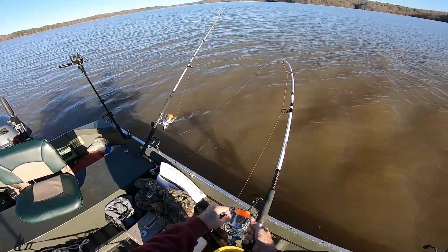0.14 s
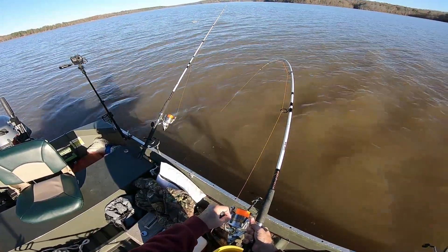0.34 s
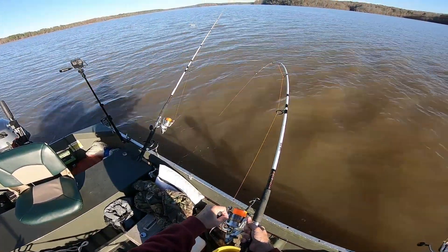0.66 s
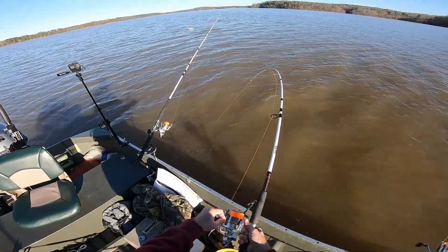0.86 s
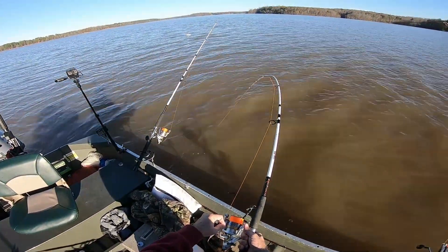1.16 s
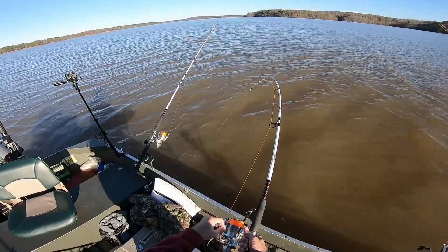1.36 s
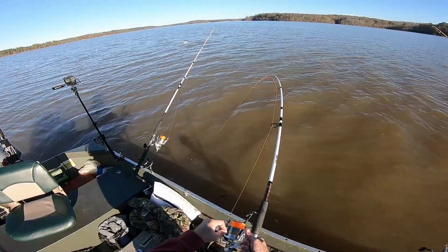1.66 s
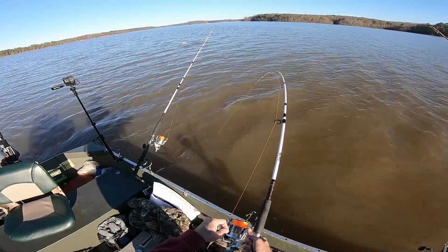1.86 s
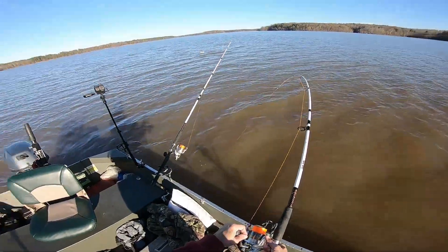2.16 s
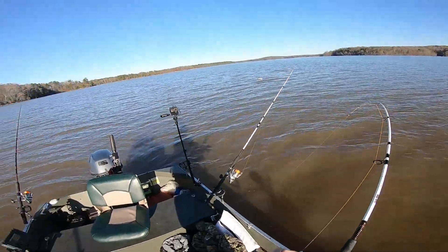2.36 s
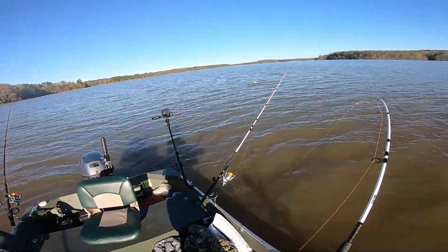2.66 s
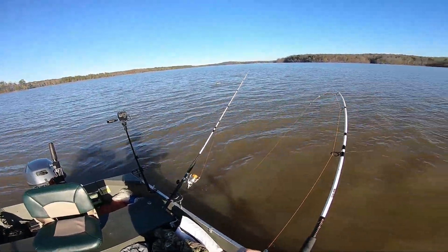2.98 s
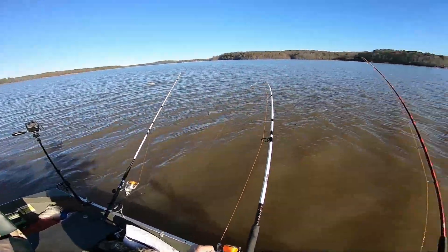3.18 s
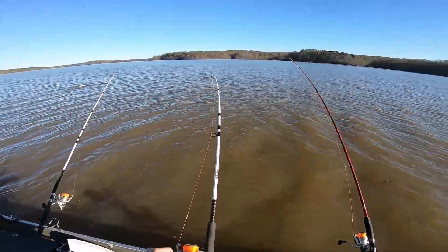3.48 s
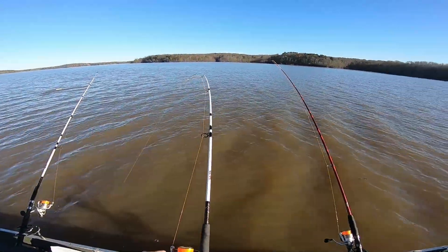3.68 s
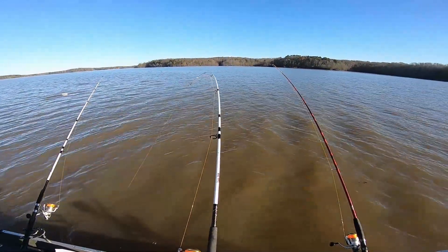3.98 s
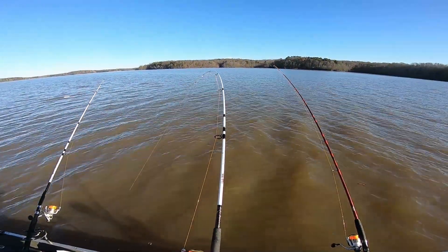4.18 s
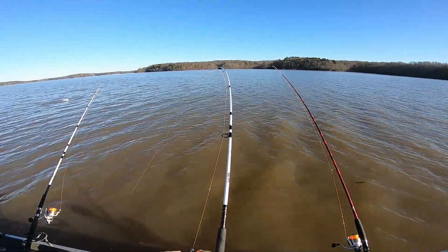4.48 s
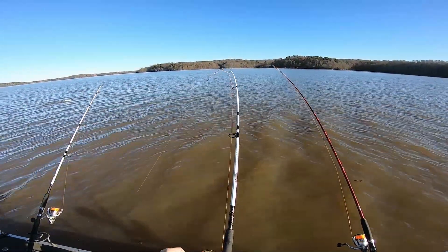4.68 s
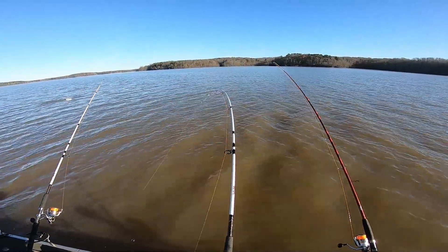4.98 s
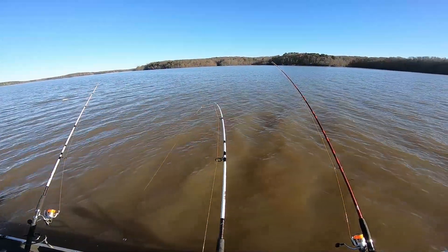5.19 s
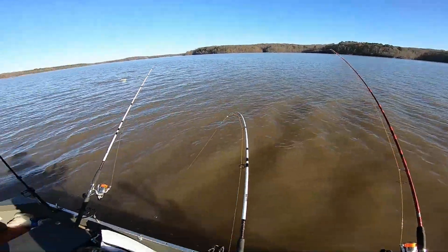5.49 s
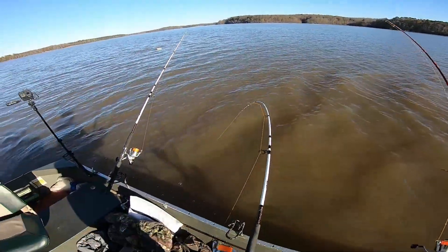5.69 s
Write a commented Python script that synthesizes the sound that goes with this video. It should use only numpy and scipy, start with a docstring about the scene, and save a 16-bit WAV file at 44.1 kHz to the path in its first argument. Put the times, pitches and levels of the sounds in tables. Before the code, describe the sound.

Small lake waves slap the side of a thin metal boat, about one every three quarters of a second. Each brings a hollow drumming thud, a deep boom and a dull, gurgling splash. The hull hums softly in between. Gear knocks twice on the deck before the middle, and a fishing reel faintly hisses and ticks near the end. Heard in stereo from aboard.

```python
"""On a lake, aboard a boat with a thin metal hull, heard through a stereo pair of microphones.
Small waves slap the side, about one every three quarters of a second. Each slap drums the panels,
flexes the whole hull into a deep boom and throws a dull, gurgling splash. Between slaps the hull
hums softly over far ripples. Gear knocks twice on deck; a fishing reel rasps and ticks near the end."""
import sys
import numpy as np
from scipy import signal
from scipy.fft import rfft, irfft
from scipy.io import wavfile
from scipy.ndimage import uniform_filter1d

SR = 44100
rng = np.random.default_rng(int(sys.argv[2]) if len(sys.argv) > 2 else 0)


def bounce(signal):
    """Save signal as a 16-bit WAV file at the path given by the first command-line argument."""
    frames = np.transpose(np.atleast_2d(signal))
    limited = np.clip(frames, -1, 1)
    pcm = np.round(limited * 32767).astype(np.int16)
    wavfile.write(sys.argv[1], SR, pcm)


N = 257579

# Crests striking a panel. Each row: start in seconds, relative panel level in dB, pitch in Hz,
# relative cavity level in dB.
CREST_STRIKES = [(0.131, -36, 239.5, -51), (0.176, -35.5, 226.3, -42.5), (0.241, -34.5, 290, -45),
                 (0.316, -33.5, 295.5, -50.5), (0.346, -19, 134, -66), (0.394, -24, 145, -41),
                 (0.866, -23, 208.2, -47.5), (0.891, -29.5, 159.3, -41.5), (0.941, -37.5, 203, -43),
                 (0.971, -29, 326.4, -34.5), (0.992, -26, 295, -46), (1.014, -14, 127.3, -35),
                 (1.035, -26.5, 152.7, -37), (1.548, -37, 177.4, -56), (1.629, -30, 188, -39.5),
                 (1.659, -28, 177.7, -39.5), (1.688, -15.5, 161.8, -45), (1.799, -28, 116.5, -69),
                 (2.409, -17, 187.7, -24.5), (2.446, -25.5, 296, -50), (2.473, -16, 185.5, -29.5),
                 (2.847, -32.5, 272, -45), (3.079, -32, 160.6, -39), (3.177, -24, 190, -46),
                 (3.214, -20.5, 148.7, -38), (3.245, -25.5, 366.6, -34.5), (3.311, -30.5, 110, -35.5),
                 (3.736, -29.5, 178, -69), (3.795, -27.5, 140.7, -54), (3.844, -30.5, 177, -53),
                 (3.881, -27, 173, -42.5), (3.932, -41, 305, -47), (4.04, -33.5, 146.2, -26),
                 (4.6, -38, 182.3, -37), (4.626, -30, 265, -35.5), (4.681, -30.5, 229, -34.5),
                 (4.73, -20, 109, -44.5), (4.849, -11, 144, -44), (4.875, -20, 131.3, -49),
                 (5.428, -34.5, 202, -61.5), (5.556, -22, 226.5, -35), (5.623, -29, 275.3, -43),
                 (5.677, -40, 182.6, -46.5)]
# Water surging against the side. Each row: crest start and length in seconds, then relative levels
# of drumming, wash and spray in dB.
SURGES = [(0.189, 0.026, -41, -57, -87), (0.279, 0.062, -48, -60, -72), (0.376, 0.036, -27, -54, -70),
          (0.48, 0.01954, -38.5, -64.5, -79), (0.874, .025, -33, -49.5, -65.5),
          (0.94, 0.045, -41.5, -53, -77.5), (1.005, 0.021, -23, -39, -60), (1.555, .01, -38.5, -73, -90.5),
          (1.626, .03, -32, -51.5, -73.5), (1.664, 0.04008, -25.5, -47.5, -67),
          (1.75, .04, -36.5, -57, -64.5), (2.231, .12, -56.5, -62, -86.5), (2.354, 0.035, -54, -55.5, -77),
          (2.411, 0.043, -24.5, -47.5, -64), (2.472, 0.048, -25, -51.5, -65.5),
          (2.857, 0.0087, -39.5, -67, -87), (3.076, 0.016, -40.5, -60, -96),
          (3.189, 0.015, -30, -59.5, -70.5), (3.245, 0.01502, -30, -46, -60.5),
          (3.742, 0.0594, -36, -63, -75.5), (3.874, 0.061, -40, -63, -84.5),
          (3.941, .03, -47.5, -64.5, -73), (4.005, .03, -48.5, -48, -69), (4.037, 0.02048, -28, -43, -60),
          (4.611, 0.026, -39, -57, -71.5), (4.684, 0.023, -34, -50, -71), (4.719, 0.031, -23.5, -49.5, -61),
          (4.836, 0.022, -21.5, -45.5, -59), (4.926, .03, -33.5, -57, -68),
          (5.044, 0.0316, -49.5, -66.5, -77), (5.446, 0.018, -45.5, -67.5, -80),
          (5.566, .06, -32.5, -48.5, -67.5), (5.668, 0.043, -38.5, -49.5, -65)]
# How each layer follows a surge. Each reads: crest rise and fall in dB/s, skirt level against the
# crest in dB, skirt rise and fall in dB/s.
DRUM_SHAPE = (600, 149.5, -34, 90, 60)
WASH_SHAPE = (898.5, 258, -24.5, 66, 61.5)
SPRAY_SHAPE = (593.5, 220, -11, 108.5, 89)
# Waves flexing the whole hull. Each row: start, rise and hold in seconds, level in dB, first and
# last pitch in Hz, left over right in dB.
HULL_FLEXES = [(0.34, 0.011, 0.13, -27.5, 56.64, 71.14, -1), (0.971, 0.066, 0.171, -22, 44.07, 27.92, -9),
               (1.404, 0.068, 0.065, -44, 30.22, 32.7, -17), (1.619, 0.054, 0.098, -23.5, 46.97, 46.74, -2),
               (2.102, 0.045, .12, -36.5, 27.04, 25.09, -8), (2.385, 0.062, .14, -31.5, 61.52, 56.9, -3),
               (2.585, .04, 0.053, -40.5, 45.8, 59.72, -3.5),
               (3.005, 0.046, 0.027, -51.5, 40.22, 39.74, -15), (3.18, 0.089, 0.059, -25, 52.18, 47.66, -4),
               (3.673, 0.042, 0.14, -47, 40.37, 49.7, -1), (4.028, 0.059, 0.066, -29, 51.7, 33.78, -16),
               (4.217, 0.025, 0.0519, -46, 30.08, 27.9, -6), (4.661, 0.089, 0.059, -18.5, 52, 48.9, -10.5),
               (4.818, 0.03, 0.12, -18.5, 49.99, 53.8, -4.5), (5.1, 0.057, 0.15, -45, 51.65, 45.74, -4),
               (5.389, 0.057, 0.015, -43.5, 39.18, 34.78, -22),
               (5.521, 0.048, .1, -46.5, 45.4, 50.6, -19.5)]
# Air pockets popping in the splash. Each row: start in seconds, relative level in dB, pitch in Hz.
AIR_POCKETS = [(0.123, -56, 855), (0.2, -50.5, 597), (0.261, -55, 1827), (0.317, -57.5, 1485),
               (0.348, -60, 2000), (0.375, -51.5, 2433), (0.484, -59, 1306), (0.865, -44, 1840),
               (0.932, -46.5, 990), (0.993, -34.5, 460), (1.011, -51.5, 2190), (1.535, -68, 2890),
               (1.553, -40, 390), (1.623, -47.5, 1402), (1.665, -35.5, 705), (1.765, -52, 1910),
               (2.412, -52.5, 1920), (2.29, -67, 2700), (2.469, -53, 2420), (3.075, -55.5, 488),
               (3.2, -44.5, 448), (3.24, -47, 1374), (3.692, -58, 715), (3.79, -49, 1403),
               (3.871, -58.5, 1672), (3.918, -70, 3660), (3.961, -62, 2600), (3.989, -61, 3146),
               (4.009, -45, 1037), (4.04, -40, 761), (4.6, -47, 671), (4.618, -54.5, 2203),
               (4.685, -45.5, 1489), (4.725, -49, 1879), (4.761, -51.5, 1474), (4.834, -47.5, 2367),
               (4.892, -46.5, 1297), (4.939, -54.5, 1460), (5.057, -63.5, 2418), (5.526, -51, 1005),
               (5.567, -41.5, 703), (5.603, -54, 1022), (5.676, -45, 765)]
# Gear hitting the deck. Each row: start in seconds, peak in dB, left over right in dB.
GEAR_KNOCKS = [(2.145, -46, -5), (2.331, -28.5, -15.5)]
# The reel's pawl dropping. Each row: start in seconds, relative level in dB, ring over snap in dB.
REEL_TICKS = [(5.0767, -57, -6), (5.0949, -58, -5), (5.1782, -68, -3.5), (5.2369, -63, -17),
              (5.284, -63, -7), (5.4263, -65, -10), (5.475, -57, -10), (5.6055, -65, -4.5),
              (5.663, -56.5, 5), (5.73, -65, -3), (5.759, -58.5, 5.5), (5.8046, -57, 3.5)]
# The hiss of the turning reel. Each row: time in seconds, level in dB.
REEL_HISS_LEVELS = [(4.95, -80.5), (5.1, -73.5), (5.7, -70), (5.84, -69.5)]

# Modes of the struck deck and pawl. Each row: frequency in Hz, relative level in dB, T60 in seconds.
DECK_MODES = [(210, -2.5, 0.046), (405, -2, 0.018), (1202, 0.5, 0.004), (1790, -18.5, 0.017),
              (2570, -23, 0.012), (4280, -36, .012), (7300, -36, 0.0096)]
PAWL_MODES = [(3877, 2, 0.024), (6230, 3, 0.015), (7700, -13, .012)]

# Colours of the noises. Each row: frequency in Hz, relative spectral density in dB.
CAVITY_SPECTRUM = [(250, -53), (340, 7), (500, -11), (750, -17), (1000, -39)]  # the hollow under the deck
DRUM_SPECTRUM = [(70, -29), (110, -15), (190, 1.5), (260, -3), (400, -9), (550, -50.5)]
WASH_SPECTRUM = [(330, -38.5), (450, -2), (700, -4.5), (1000, -10), (1700, -19.5), (2500, -27), (3600, -37),
                 (5000, -50)]
SPRAY_SPECTRUM = [(2500, 0), (3500, -8.5), (5200, -11.5), (7600, -7.5), (9500, -16.5), (11000, -22),
                  (13000, -51.5)]
REEL_SPECTRUM = [(900, -27.5), (1500, 1.5), (2800, -7.5), (4000, -2), (5200, -8.5), (7600, -11),
                 (11000, -21.5), (15600, -29)]
MURMUR_SPECTRUM = [(12, -56), (20, -4), (53, -4), (104, -0.5), (208, 2), (232, -7.5), (267, -15),
                   (521, -31), (837, -21.5), (1050, -33.5), (1340, -32), (4840, -47.5), (7770, -41.5),
                   (12500, -51.5), (15600, -69)]  # hull hum and far ripples

# What the two microphones share. Each row: frequency in Hz, coherence from 0 to 1.
MIC_COHERENCE = [(30, 0.98), (150, 0.33), (500, 1), (2000, 0.44), (5000, 0.48), (10000, 0.14)]
# Phase between the microphones. Each row: frequency in Hz, left minus right in radians.
MIC_PHASE = [(100, 2.5), (400, -1.15), (860, -2.5), (2240, -2), (4300, -6.5), (9000, -8.5)]
# Balance of the microphones. Each row: frequency in Hz, left over right in dB.
MIC_BALANCE = [(40, -16.5), (130, 2.5), (290, 6.5), (640, -1), (1200, -3.5), (2400, -2), (6000, 0)]


def panel_thuds():
    """Each crest rings a hull panel, whose pitch sags, and the cavity behind it."""
    out, t = np.zeros((2, N)), np.arange(SR // 4) / SR
    hollow = noise(CAVITY_SPECTRUM)
    for start, panel_db, hz, cavity_db in CREST_STRIKES:
        tone = wavering(hz * np.exp(-1.5 * t), wobble=0.1, width_s=0.0051)
        panel = tone * rise_and_decay(t, rise_s=0.0022, t60_s=0.24)
        offset = rng.integers(N - len(t))
        cavity = hollow[:, offset:offset + len(t)] * rise_and_decay(t, rise_s=0.004, t60_s=0.28)
        add(out, start, amp(panel_db - 7) * panel + amp(cavity_db - 8) * cavity)
    return out


def surging_water():
    """Panels drum under the wave, lower when loaded hard, while wash and spray come in lumps."""
    starts, lengths, drum_peaks, wash_peaks, spray_peaks = np.transpose(SURGES)
    drum_db = surge_level(starts, lengths, drum_peaks, DRUM_SHAPE)
    wash_db = surge_level(starts, lengths, wash_peaks, WASH_SHAPE)
    spray_db = surge_level(starts, 0.89 * lengths, spray_peaks, SPRAY_SHAPE)
    loaded_hz = 205 * np.exp(-0.011 * (drum_db + 55))
    panel = wavering(loaded_hz, wobble=0.2, width_s=0.01202) + amp(-4.5) * noise(DRUM_SPECTRUM)
    drum = amp(drum_db - 5 + 2.2 * drift(0.014)) * panel
    wash = amp(wash_db + 2 + 1.7 * drift(0.01)) * noise(WASH_SPECTRUM)
    spray = amp(spray_db + 4.84 + 1.7 * drift(0.0057)) * noise(SPRAY_SPECTRUM)
    return drum + wash + spray


def hull_boom():
    """The hull flexes in two modes; each wave pushes it, holds it and lets go, bending its pitch."""
    rest_db, rise_db, sag_db_per_s, release_db_per_s = -59, 32.5, 57, 194
    t, level = np.arange(N) / SR, amp(rest_db)
    for start, rise, hold, db, *_ in HULL_FLEXES:
        top, end = start + rise, start + rise + hold
        climb_db = rise_db * np.maximum(top - t, 0) / rise
        fall_db = sag_db_per_s * np.clip(t - top, 0, hold) + release_db_per_s * np.maximum(t - end, 0)
        level = np.maximum(level, amp(db - climb_db - fall_db))
    starts, rises, holds, _, first_hz, last_hz, sides_db = np.transpose(HULL_FLEXES)
    ends = np.minimum(starts + rises + holds, np.append(starts[1:], N / SR))  # cut by the next wave
    hz = np.interp(t, np.ravel([starts, ends], "F"), np.ravel([first_hz, last_hz], "F"))
    pan_db = np.interp(t, starts + rises, sides_db)
    low_mode = wavering(hz, wobble=0.1218, width_s=0.023)
    late_left = np.roll(low_mode, round(0.0032 * SR))  # the left microphone gets it a little later
    high_mode = amp(-8.5) * wavering(1.9 * hz, wobble=0.25, width_s=0.02707)
    modes = panned(np.array([late_left, low_mode]), pan_db) + high_mode
    return level * amp(3.27 * drift(0.011)) * modes


def splash_plops():
    """Air pockets pop in clusters: a rough tone on each side, with a puff of noise near their pitch."""
    out, t = np.zeros((2, N)), np.arange(SR // 5) / SR
    envelope = rise_and_decay(t, rise_s=0.00097, t60_s=0.15)
    for start, db, hz in AIR_POCKETS:
        left = wavering(hz * np.exp(0.2 * t), wobble=0.021, width_s=0.0041)
        right = wavering(np.full(len(t), hz), wobble=0.08, width_s=0.0018)
        puff = amp(-4.5) * band_noise(hz / 1.52, hz * 1.134, len(t))
        add(out, start, amp(db - 2) * (np.array([left, right]) + puff) * envelope)
    return out


def gear_knocks():
    """Gear knocks dryly on the deck, off to the right."""
    out, knock = np.zeros((2, N)), ring(DECK_MODES, rise_s=0.0015)
    for start, db, pan_db in GEAR_KNOCKS:
        add(out, start, panned(amp(db) * knock, pan_db))
    return out


def reel_ticks():
    """The pawl snaps onto a tooth; a few of the last ticks ring briefly."""
    out, t = np.zeros((2, N)), np.arange(SR // 10) / SR
    pawl, snap_t60_s = ring(PAWL_MODES, rise_s=0.00034), 0.0072
    for start, db, ring_db in REEL_TICKS:
        snap = band_noise(3500, 11000, len(t)) * amp(-60 * t / snap_t60_s)
        add(out, start, amp(db + 2.5) * (snap + amp(ring_db) * pawl))
    return out


def reel_hiss():
    """The turning reel lays a thin, lumpy hiss under the ticks."""
    db = np.interp(np.arange(N) / SR, *np.transpose(REEL_HISS_LEVELS), left=-200)
    return amp(db + 3 * drift(0.015)) * noise(REEL_SPECTRUM)


def hull_hum():
    """One panel sings a near steady note; the hull's murmur swells while the far ripples hold level."""
    note = amp(-57.5 + 2.4 * drift(0.11)) * wavering(np.full(N, 212), wobble=0.0152, width_s=0.04)
    murmur = amp(-50.5) * noise(MURMUR_SPECTRUM)
    hull = signal.sosfiltfilt(signal.butter(2, 600, fs=SR, output="sos"), murmur)
    ripples = murmur - hull
    return note + amp(1.66 * drift(0.24)) * hull + ripples


def microphone_pair(sound):
    """The right microphone hears part of the left's sound, shifted in phase, plus a part of its own."""
    hz = np.fft.rfftfreq(N, 1 / SR)
    left, own = rfft(sound)
    shared, phase = curve_at(MIC_COHERENCE, hz), curve_at(MIC_PHASE, hz)
    right = shared * left * np.exp(-1j * phase) + np.sqrt(1 - shared ** 2) * own
    tilt = amp(curve_at(MIC_BALANCE, hz) / 2)
    return irfft([left * tilt, right / tilt], N)


def surge_level(starts, lengths, peaks_db, shape):
    """Level in dB: each surge is a crest on a slow skirt that builds before it and drains after."""
    rise, fall, skirt_db, skirt_rise, skirt_fall = shape
    grid = np.arange(0, N, 64)
    since = grid[:, None] / SR - starts
    before, after = np.maximum(-since, 0), np.maximum(since - lengths, 0)
    crest_drop = rise * before + fall * after
    skirt_drop = skirt_rise * before + skirt_fall * after - skirt_db
    loudest_db = (peaks_db - np.minimum(crest_drop, skirt_drop)).max(axis=1)
    return np.interp(np.arange(N), grid, loudest_db)


def rise_and_decay(t, rise_s, t60_s):
    """A soft rise into an exponential decay, peak 1."""
    envelope = (1 - np.exp(-(t / rise_s) ** 2)) * amp(-60 * t / t60_s)
    return envelope / envelope.max()


def ring(modes, rise_s):
    """Decaying modes set off together, peak 1."""
    t = np.arange(SR // 10) / SR
    tones = sum(amp(db - 60 * t / t60) * np.sin(2 * np.pi * hz * t) for hz, db, t60 in modes)
    tones *= 1 - np.exp(-t / rise_s)
    return tones / np.abs(tones).max()


def wavering(hz, wobble, width_s):
    """A tone of rms 1 whose pitch strays about the curve hz."""
    pitch = hz * np.exp(wobble * drift(width_s, len(hz)))
    return np.sqrt(2) * np.sin(2 * np.pi * np.cumsum(pitch) / SR)


def drift(width_s, size=N):
    """A random wander of rms 1, smoothed over width_s."""
    span = round(width_s * SR)
    return unit_rms(uniform_filter1d(uniform_filter1d(rng.standard_normal(size), span), span))


def noise(spectrum):
    """Two unrelated noises of one colour, falling away steeply above the last point."""
    hz = np.fft.rfftfreq(N, 1 / SR)
    rolloff = np.maximum(hz / spectrum[-1][0], 1) ** -6
    white = rfft(rng.standard_normal((2, N)))
    return unit_rms(irfft(white * amp(curve_at(spectrum, hz)) * rolloff, N))


def band_noise(low_hz, high_hz, size):
    """Two unrelated noises in one band, rms 1."""
    band = signal.butter(2, [low_hz, high_hz], "band", fs=SR, output="sos")
    return unit_rms(signal.sosfilt(band, rng.standard_normal((2, size))))


def curve_at(points, hz):
    """Interpolate along log frequency."""
    point_hz, values = np.transpose(points)
    return np.interp(np.log(hz + 1), np.log(point_hz + 1), values)


def amp(db):
    return 10 ** (np.asarray(db) / 20)


def unit_rms(x):
    return x / np.sqrt(np.mean(x ** 2) + 1e-20)


def panned(x, pan_db):
    return x * amp(np.array([[0.5], [-0.5]]) * pan_db)


def add(mix, start_s, sound):
    part = mix[..., round(start_s * SR):][..., :sound.shape[-1]]
    part += sound[..., :part.shape[-1]]


def scene():
    """Boom and knocks carry their own panning; the rest is spread across the microphone pair."""
    placed = hull_boom() + gear_knocks()
    spread = hull_hum() + surging_water() + panel_thuds() + splash_plops() + reel_ticks() + reel_hiss()
    return placed + microphone_pair(spread)


def record(dry):
    """The recorder cuts off the highest treble."""
    cutoff_hz = 15750
    lowpass = signal.firwin(511, cutoff_hz, window=("kaiser", 9), fs=SR)
    return signal.oaconvolve(dry, lowpass[None], "same")


dry = scene()
out = record(dry)
bounce(out)
```